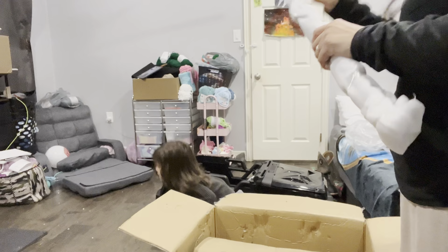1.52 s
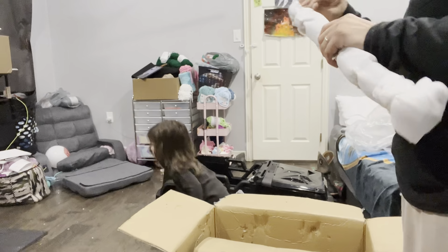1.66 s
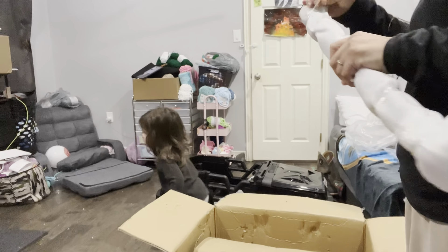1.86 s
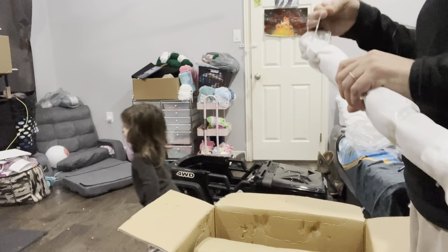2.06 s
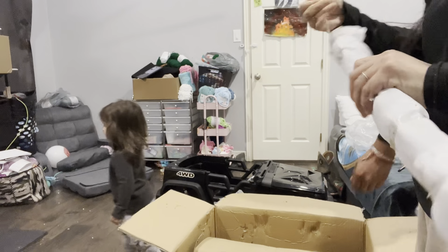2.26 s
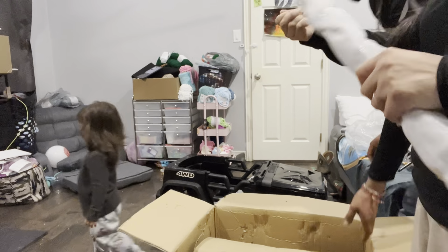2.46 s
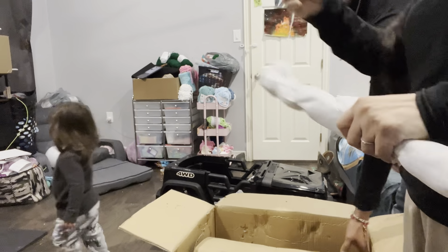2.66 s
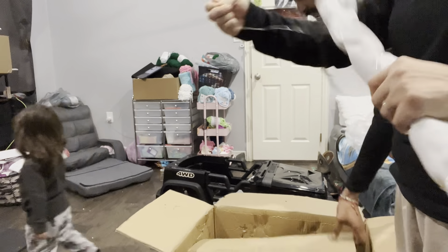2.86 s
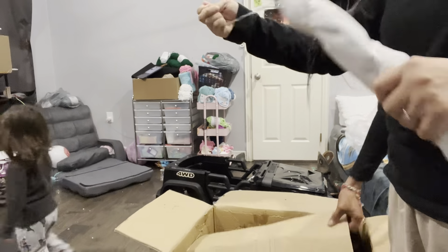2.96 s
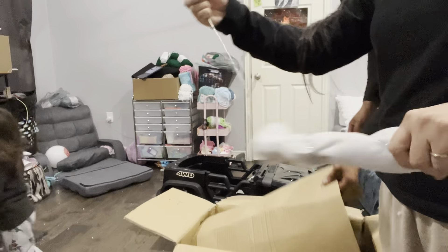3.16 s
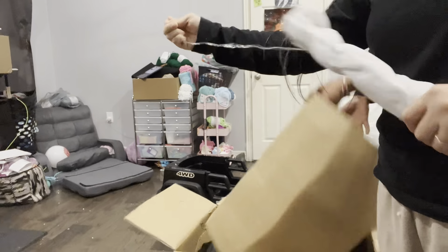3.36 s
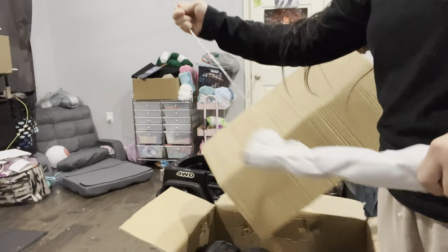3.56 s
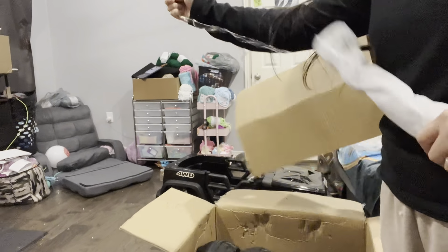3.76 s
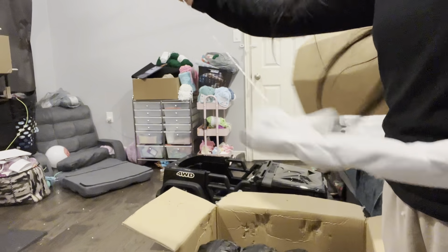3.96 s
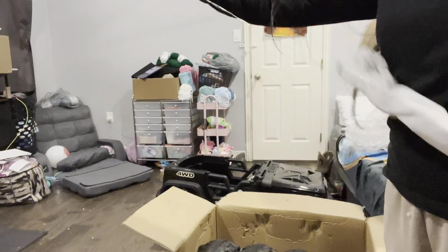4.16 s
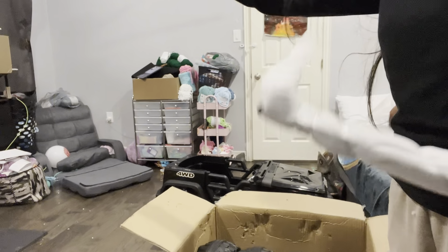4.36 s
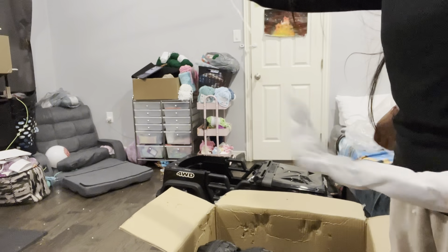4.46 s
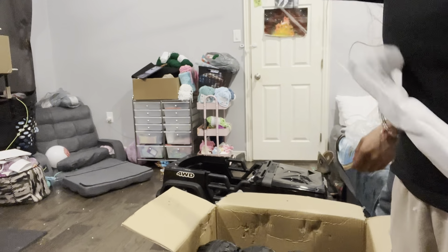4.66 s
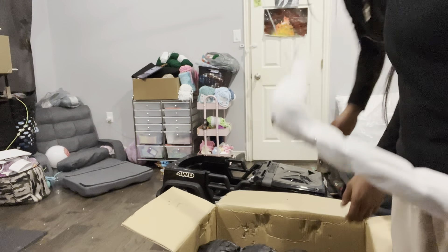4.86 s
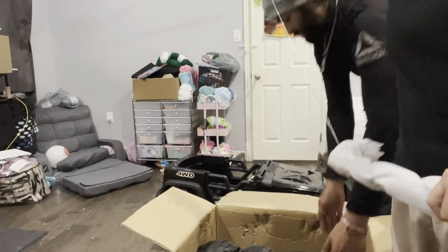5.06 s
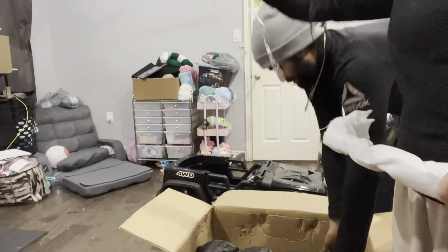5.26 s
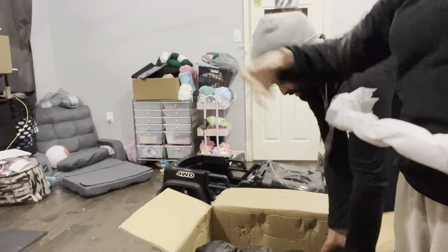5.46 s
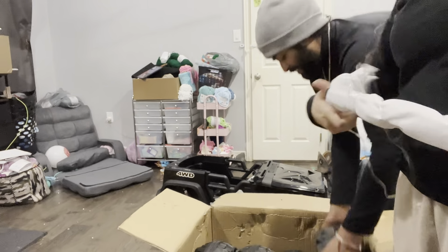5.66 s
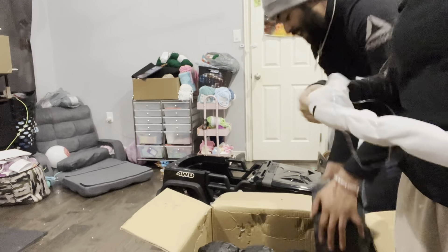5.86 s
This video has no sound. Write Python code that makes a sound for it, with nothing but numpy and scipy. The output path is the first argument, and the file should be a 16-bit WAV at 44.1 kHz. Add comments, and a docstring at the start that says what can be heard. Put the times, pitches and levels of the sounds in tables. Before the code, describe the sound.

Close-up unpacking: hollow box thumps, crisp cardboard cracks and crinkling packing film over faint hiss, with a brief metallic jingle near the end.

```python
"""Unpacking a big cardboard box

Cardboard and foam packing are pulled out of a box in a bedroom, close to a phone. Over quiet hiss,
noise shaken through wall resonances booms as the box drags, and ticking noise makes foam and film rustle.
Short pushes ring the walls as knocks, shaped noise bursts snap as creases, decaying sines jingle as metal.
The phone hears bass from two ports and places the treble by a short delay."""
import sys
import numpy as np
from scipy import signal
from scipy.fft import rfft, irfft, next_fast_len
from scipy.io import wavfile
from scipy.ndimage import uniform_filter1d

SR = 44100
rng = np.random.default_rng(int(sys.argv[2]) if len(sys.argv) > 2 else 0)


def master_out(mix):
    """Clip the mix to full scale and print it as 16-bit PCM to the path in sys.argv[1]."""
    frames = np.transpose(np.atleast_2d(mix))
    ceiling = np.clip(frames, -1, 1)
    pcm = np.round(ceiling * 32767).astype(np.int16)
    wavfile.write(sys.argv[1], SR, pcm)


N = 260975

# Hiss of room and microphones. Each row: frequency in Hz, density in dB per Hz.
AIR_COLOUR = [(30, -144), (50, -66), (70, -100), (200, -103), (600, -108), (1500, -107), (5000, -104),
              (7500, -108.5), (12000, -102), (15700, -110), (16100, -140)]
# Room decay. Each row: frequency in Hz, time to fall 60 dB in seconds.
ROOM_DECAY = [(150, 0.29), (500, 0.35), (1500, 0.31), (4000, 0.39), (9000, 0.26), (15000, 0.14)]
# Likeness of a spread source at the two ports. Each row: frequency in Hz, likeness from 0 to 1.
PORT_LIKENESS = [(120, .95), (250, .75), (500, .4), (2500, .35), (5500, .4)]

# Jolts of a small metal part. Each row: start in seconds, level in dB.
METAL_JOLTS = [(5.641, -38), (5.649, -29), (5.732, -50), (5.785, -53)]
# Modes of that part. Each row: pitch in Hz, relative level in dB, time to fall 60 dB in seconds.
METAL_MODES = [(2880, -5, .1), (2980, -2, .08), (3080, -2, .09), (4786, 3, .12), (4791, -14, .7),
               (6915, -4, .13), (7240, -10, .35), (9000, -9, .15), (9450, -4, .14), (10430, -7, .22),
               (11500, -6, .17), (12600, -9, .15), (14200, -6, .1), (14600, -6, .11)]
# A thin wavering tone. One row: start in seconds, end in seconds, level in dB, pitch in Hz, width in Hz.
THIN_TONE = (5.8, 5.96, -45, 2010, 40)

# Modes of the box walls, main wall first. Each row: pitch in Hz, width in Hz, relative level in dB.
WALL_MODES = [(184, 22, -11.5), (266, 30, 6), (322, 5.9, -14.5), (434, 182, 1.5), (544, 38, -1),
              (612, 24, 0.5), (672, 380, -6)]
# Pitch of the booming wall as the box flexes. Each row: time in seconds, pitch in Hz.
FLEXING_PITCH = [(0, 202), (.9, 203), (1.15, 242), (1.4, 191), (2.6, 200.4), (3.22, 224), (3.27, 175),
                 (3.5, 218), (4.4, 203), (4.55, 253), (4.8, 248), (5.0, 187), (5.12, 150), (5.3, 163.7),
                 (5.55, 190), (5.66, 227), (5.9, 233)]
# Colour of the floor thud. Each row: frequency in Hz, relative density in dB per Hz.
THUD_COLOUR = [(25, -18), (36, 9), (62, 20.5), (90, 6.5), (115, 16.5), (150, -21), (190, -45)]
# Pulls that drag and flex the box. Each row: peak time in seconds, seconds to rise 20 dB, seconds to fall
# 20 dB, wall boom in dB, upper modes in dB, floor thud in dB.
PULL_STROKES = [(0.02, 0.37, .3, -48, -52, -61), (0.1, 0.066, 0.18, -32, -34, -33.5),
                (0.259, 0.12, 0.26, -43, -49, -40.5), (0.489, 0.065, 0.18, -54, -47.5, -74),
                (0.789, 0.17, 0.11, -56, -57.5, -62), (0.923, 0.037, 0.56, -51, -61, -56),
                (1.12, 0.34, 0.1, -53, -50, -63.5), (1.44, 0.096, 0.072, -61, -57, -55.5),
                (1.525, 0.025, 0.03, -54, -63, -74), (1.81, 0.017, 0.19, -48.5, -43, -57),
                (1.895, 0.011, 0.044, -33, -47, -60), (2.071, 0.23, 0.11, -71, -54.5, -76),
                (2.193, 0.016, 0.017, -38, -41, -56), (2.325, 0.011, 0.045, -47, -52, -48),
                (2.519, 0.083, 0.093, -92.5, -108, -38), (2.66, 0.06, 0.89, -32.5, -72, -40),
                (2.885, 0.44, 0.066, -37.5, -37, -35), (3.045, 0.28, 0.33, -44, -41, -36),
                (3.245, 0.19, 0.23, -26, -28, -40), (3.31, 0.098, 0.12, -20.5, -28, -26.5),
                (3.42, 0.11, 0.7, -39, -46, -54), (3.651, 0.425, 0.053, -36, -71, -34.5),
                (3.955, 0.019, 0.19, -34.5, -78.5, -43), (4.057, 0.27, 0.04, -42, -45, -38.5),
                (4.245, 0.088, 0.11, -44.5, -45.5, -48), (4.441, 0.072, 0.13, -42, -42, -49),
                (4.55, 0.0047, 0.1, -24.5, -29, -20.5), (4.62, 0.14, 0.28, -40.5, -43, -35.5),
                (4.74, 0.33, 0.044, -35, -41.5, -57), (5.015, 0.15, 0.63, -40, -53, -44.5),
                (5.125, 0.017, 0.11, -28, -31, -30), (5.22, 0.059, 0.1, -50, -40, -68),
                (5.28, 0.036, 0.13, -31, -47, -35), (5.405, 0.011, 0.047, -35, -41, -45.5),
                (5.485, 0.19, 0.28, -33.5, -38, -41.5), (5.56, 0.057, 0.4, -21.5, -26, -30),
                (5.63, 0.058, 0.18, -18.5, -20, -27), (5.822, 0.041, 0.41, -21.5, -31.5, -50),
                (5.918, 0.076, .3, -25, -43, -55)]

# Rubs of foam and film. Each row: peak time in seconds, seconds to rise 20 dB, seconds to fall 20 dB,
# fine crackle in dB, duller cardboard scrape in dB.
RUB_STROKES = [(0.05, 0.1, 0.31, -41.5, -44.5), (0.428, 0.034, 0.18, -48, -53),
               (0.476, 0.12, 0.094, -42.5, -57), (0.784, 0.23, 0.23, -56, -65),
               (0.908, 0.07, 0.3, -49, -60), (1.11, 0.88, 0.12, -54.5, -60.5),
               (1.516, 0.02, 0.14, -44.5, -71.5), (1.612, 0.11, 0.061, -55, -52),
               (1.43, 0.13, 0.18, -69, -77), (1.73, 0.6, 0.13, -52.5, -75), (1.9, 0.25, 0.99, -46.5, -53),
               (2.2, 0.086, 0.23, -49, -49), (2.395, 0.05, 0.054, -40, -70), (2.47, 0.24, .8, -86, -77),
               (2.6, 0.24, .16, -44, -75), (2.9, 0.56, 0.4, -37.5, -41), (2.99, 0.094, 0.25, -30, -42),
               (3.042, 0.054, 0.95, -35.5, -37), (3.265, 0.33, 0.083, -25, -57),
               (3.392, 0.014, 0.034, -27.5, -43), (3.43, .1, 0.13, -49, -67),
               (3.782, 0.11, 0.42, -45.5, -54), (4.266, 0.23, 0.12, -44, -50),
               (4.572, 0.14, 0.081, -30.5, -37.5), (4.64, 0.21, 0.15, -39.5, -40.5),
               (4.8, 0.15, .13, -43, -49), (4.892, 0.04, 0.067, -35.5, -38),
               (4.93, 0.036, 0.015, -34.5, -57), (5.05, 0.31, 1, -44.5, -55), (5.118, 0.038, 1, -49.5, -59),
               (5.55, 0.078, 0.13, -47, -40), (5.666, 0.18, 0.092, -34.5, -53),
               (5.72, 0.22, 0.18, -40, -57)]
# Colour of the fine crackle. Each row: frequency in Hz, relative density in dB per Hz.
FIZZ_COLOUR = [(300, -5.5), (1500, -15), (3000, -9), (5000, -10.5), (7500, -5.5), (10500, -8.5),
               (13000, -18), (15000, -14), (15750, -16), (16200, -68)]
# Colour of the cardboard scrape. Each row: frequency in Hz, relative density in dB per Hz.
SCRAPE_COLOUR = [(200, -33), (600, 14), (1200, 17), (2000, 19.5), (3500, -5), (7000, -37)]

# Knocks on the box. Each row: start in seconds, main wall peak in dB, main wall pitch in Hz,
# upper modes relative to that peak in dB, pitch of the struck flap in Hz.
BOX_KNOCKS = [(0.072, -22.5, 222, 9, 583), (0.097, -18, 175, -13, 540), (0.151, -23, 239, -23, 400),
              (0.244, -30.5, 226, -19, 540), (1.108, -45, 253, -15, 430), (1.125, -34, 254, -19, 430),
              (1.805, -49, 205, 6, 457), (1.887, -38, 243, 13, 472), (2.65, -28.5, 175, -3, 354),
              (2.791, -22.5, 207, -4, 620), (2.829, -35.5, 223, 3, 467), (2.86, -26, 228, -19, 407),
              (2.99, -26.5, 210, -9, 442), (3.045, -24.5, 200, -10, 430), (3.063, -38, 201, 10, 620),
              (3.09, -25, 201, -15, 456), (3.181, -35, 238, 7, 480), (3.21, -26.5, 254, -14, 606),
              (3.2604, -4.5, 192.4, -2.5, 621), (3.29, -24, 193, 8.5, 484), (3.319, -23, 191, -9, 346),
              (3.386, -38, 199, 7.5, 330), (3.436, -34, 190, 8.5, 307), (3.47, -34.5, 227, 9.5, 305),
              (3.553, -33, 233, 3.5, 530), (3.95, -34, 189, -11, 338), (4.444, -49, 259, 20, 420),
              (4.539, -30.5, 260, 6, 700), (4.551, -21, 250, 2, 744), (4.559, -22, 249, 1, 617),
              (4.586, -17.5, 242, -7, 556), (4.613, -24, 253, -5, 650), (4.636, -32, 260, -6, 560),
              (4.652, -30.5, 255, 5, 766), (4.69, -25, 285, -3, 530), (4.73, -35, 267, -8, 527),
              (4.757, -35.5, 245, 3, 625), (5.007, -30.5, 194, -17, 410), (5.118, -24, 136, 4, 737),
              (5.143, -29, 205, 1, 610), (5.208, -32, 195, -6, 596), (5.268, -25.5, 162, -3, 570),
              (5.398, -40, 173, 8.5, 450), (5.458, -20.5, 230, -30, 384), (5.519, -18, 226, -14, 450),
              (5.548, -3.5, 181.4, -10.5, 347), (5.596, -15, 173, -15, 300), (5.6188, -6, 203, -3, 556),
              (5.638, -14.5, 145.8, 9.5, 542), (5.655, -14, 266, -3, 530), (5.69, -20.5, 196, 10, 334),
              (5.704, -24.5, 197, 6.5, 416), (5.722, -23, 205, 9, 495), (5.749, -29.5, 200, 7, 423),
              (5.814, -16, 218, -5.5, 463), (5.841, -26.5, 255, 2.5, 520), (5.88, -20.5, 235, 0.5, 584)]

# Snapping creases. Each row: start in seconds, peak in dB, thump and body each relative to the crack
# in dB per Hz, panel pitch in Hz, left over right in dB.
CREASE_SNAPS = [(0.0706, -3.5, 1.5, 16, 1870, 3), (0.0742, -9.5, 11, 12, 1200, -1),
                (0.41, -30, 6, -1, 1420, -4), (0.4258, -29.5, -11, 1, 1450, -3),
                (0.4819, -25, -5, 2, 991, -5), (0.489, -24, 5, 10, 1530, -3), (1.099, -42, 18, 30, 1310, 0),
                (1.517, -35.5, 14, 19, 1080, -2), (1.584, -20, -12, -14, 1010, -1),
                (1.61, -27, -16, 0, 2580, -12), (1.7759, -29, -10, -25, 2570, -2),
                (1.809, -27.5, 17, 2, 1040, 5), (1.8867, -2, 15.5, 8, 1750, -1),
                (2.105, -39, -10, 9, 1180, -17), (2.1631, -9, -3, -9, 1670, -5),
                (2.172, -14.5, 4, 7, 1880, 3.5), (2.1806, -9.5, 3, -1.5, 1850, -1),
                (2.3161, -7, 5.5, 2.5, 1150, 8.5), (2.5287, -14, 2.5, 3, 1130, 6.5),
                (2.5792, -14, 13.5, 3.5, 1380, 1), (2.5866, -11, -6, -4, 1830, -9),
                (2.5955, -17.5, -15, 9, 1860, 4), (2.6208, -7.5, -10, 2.5, 1880, 2),
                (2.6493, -6, 0.5, -4, 1850, 3), (2.6835, -8, -17, 4, 1120, 1.5),
                (2.701, -19, -13, -10, 1400, -27), (2.7315, -6, -17, -4, 1150, 5),
                (2.7485, -15, -3, -1, 1990, 0), (2.8703, -22, -6, -12, 1477, -11),
                (2.991, -14.5, -3, 5, 1190, -5), (3.042, -19.5, 9, 26, 1240, 1),
                (3.061, -15, -4, -21, 1400, -7), (3.1045, -8, -25, -26, 9020, -3),
                (3.1554, -23, -2, 2, 1200, 3), (3.261, -8.5, 22, 32, 1210, -20),
                (3.333, -16.5, -8, -3, 1520, -2), (3.3489, -18, 4, -2, 1370, 0),
                (3.364, -11.5, 14, -4, 2530, -2), (3.388, -13, -3, 4.5, 1260, -6),
                (3.4, -19.5, 9, 8, 1420, 3), (3.554, -6, 7.5, -8.5, 1290, 0.5),
                (3.573, -16, -3, 14, 1200, 3), (3.582, -15, -12, -14, 1260, -25),
                (3.7342, -15, 4, -8, 1690, -10), (3.8141, -25.5, 4, 1.5, 1560, -4),
                (3.9072, -33, -10, -6, 1450, 4), (3.9303, -31.5, -16, 5, 1094, -17),
                (3.974, -26, -10, -8, 1510, -4), (3.9844, -23.5, -2, -5, 1710, -19),
                (3.9879, -6, 2, -16, 1310, 11.5), (3.996, -25, -6, -2, 1700, -3),
                (4.002, -15.5, -3, -15, 1700, -11), (4.017, -29, -8, -14, 1340, 5),
                (4.027, -30, -7, -19, 1310, 3), (4.097, -25.5, -12, -12, 1166, -3),
                (4.1587, -26.5, -20, -10, 2660, 1), (4.1712, -23, -37, -14, 2500, -16),
                (4.1755, -7.5, -4.5, -9.5, 2140, 11), (4.2168, -22, 8, -3, 1830, 7),
                (4.3892, -22, 16, 12, 1340, 1), (4.409, -21.5, -13, 1, 1700, 3),
                (4.44, -17, -6, -3, 1360, -13), (4.445, -7.5, 5, -1, 1250, 0),
                (4.4765, -21.5, -11, -10, 2630, -19), (4.6359, -9.5, 8, 3, 980, 8),
                (4.6958, 0.5, 1, 2, 1310, 3.5), (4.8862, -24.5, 15, 1.5, 1425, -4),
                (4.9269, -20, 12, 0.5, 1380, -5), (5.118, -28, -3, 10, 1000, -5),
                (5.5411, -16, 39, 6, 970, -4), (5.623, -23, 13, 19, 1280, -7),
                (5.7647, -20.5, -13, 9, 4100, -6), (5.7747, -23.5, 4, 8, 1300, 0)]
# Centres in Hz of a snap's thump, body, crack and top.
SNAP_BANDS_HZ = [500, 1600, 5000, 11000]

# Balance of the ports. Each row: frequency in Hz, left over right in dB.
PORT_BALANCE = [(60, 2.5), (150, 3), (330, 4), (800, -1.5), (2000, 1.5), (8000, 0)]
# Phase lead of the left port. Each row: frequency in Hz, lead in radians.
PORT_LEAD = [(0, 0), (340, -.45), (690, -2), (950, -3.2), (1300, -6.2), (2100, -9.4), (3500, -15.5),
             (5000, -18.3), (6500, -17.72)]
# Start and end in Hz of the blend above which both sides carry one signal.
MONO_BLEND_HZ = (5600, 6600)

# Metal
METAL_RISE_S, METAL_ROOM_DB = .003, -16
# Drag: the flexing wall's ring, and its level over the fixed low modes
BOOM_WIDTH_HZ, BOOM_DB = 55, 4
# Rustle: strength of the colour patches
PATCH_DB = 2.5
# Knocks: the main wall's swell and ring, then damping by the hand, at this rate for a full-scale knock
WALL_RISE_S, RING_HZ, GRIP_S, GRIP_DB_PER_S = .005, 24, .019, 4000
# Knocks: the flap's ring, and the share of the other upper modes beside it
FLAP_WIDTH_HZ, WALL_SHARE = 40, 0.6
KNOCK_ROOM_DB = -10
# Snaps: swell, dying times of crack and crunch, and the crunch's share
SNAP_RISE_S, CRACK_S, CRUNCH_S, CRUNCH = 0.00029, 0.00028, 0.0026, 0.28
# Snaps: top band relative to the crack, per Hz; it drops as the body grows
SNAP_TOP_DB, DULL_PER_DB = -1, 0.15
PANEL_WIDTH_HZ, SNAP_ROOM_DB = 230, -4.5
# Phone: extra samples of delay on the right side above the last row of PORT_LEAD
TREBLE_LAG = 8
# Phone: the microphones fade below the first, and the sound ends at the second
BASS_CUT_HZ, EDGE_HZ = 36, 17146


def amp(db):
    """Turns decibels into a plain factor."""
    return 10 ** (np.asarray(db) / 20)


def evened(x):
    """Brings a signal to an RMS of 1."""
    return x / np.sqrt(np.mean(x ** 2) + 1e-20)


def read(points, hz):
    """Reads a curve between its points on a logarithmic frequency scale."""
    f, value = np.transpose(points)
    return np.interp(np.log(hz + 1), np.log(f + 1), value)


def add(mix, s, sound):
    """Lays a sound into the mix at s seconds, cut off at the end."""
    part = mix[..., round(s * SR):][..., :sound.shape[-1]]
    part += sound[..., :part.shape[-1]]


def filtered(x, gain):
    """Multiplies the spectrum by gain(Hz)."""
    size = next_fast_len(x.shape[-1] + 4096)
    spectrum = rfft(x, size) * gain(np.fft.rfftfreq(size, 1 / SR))
    return irfft(spectrum, size)[..., :x.shape[-1]]


def coloured(x, points):
    """Gives a signal the colour of a table in dB, at an RMS of 1."""
    return evened(filtered(x, lambda hz: amp(read(points, hz))))


def resonate(x, hz, width):
    """A two-pole resonance with gain 1 at its top."""
    return signal.lfilter(*signal.iirpeak(hz, hz / width, SR), x)


def glide(x, hz, width):
    """A resonance that follows the curve hz: shift down, smooth twice, shift back."""
    turn = np.exp(2j * np.pi * np.cumsum(hz) / SR)
    r = np.exp(-np.pi * width / SR)
    smooth = signal.lfilter([1], np.convolve([1, -r], [1, -r]), x / turn)
    return (turn * smooth).real


def pair(x, other):
    """Two ports hear a spread source alike in the bass and less alike above."""
    same = lambda hz: np.clip(read(PORT_LIKENESS, hz), 0, 1)
    shared = filtered(x, same)
    own = filtered(other, lambda hz: np.sqrt(1 - same(hz) ** 2))
    return np.array([x, shared + own])


def strokes(rows):
    """Strokes swell and die steadily in dB and sum as power: one gain curve for each level column."""
    peak, rise, fall, *levels_db = np.array(rows).T[..., None]
    t = np.arange(0, N / SR + .01, .002)
    shape_db = -20 * np.where(t < peak, (peak - t) / rise, (t - peak) / fall)
    curves = [np.linalg.norm(amp(db + shape_db), axis=0) for db in levels_db]
    return [np.interp(np.arange(N) / SR, t, curve) for curve in curves]


def crackle(per_s, spread_db, hiss):
    """Hiss plus sparse ticks of very uneven size; two unrelated hisses share the ticks' moments."""
    tick_db = spread_db * np.minimum(rng.exponential(1, N), 4)
    ticks = amp(tick_db) * (rng.random(N) < per_s / SR)
    bursts = signal.lfilter([1], [1, -.95], ticks)
    return evened((hiss + evened(bursts)) * rng.standard_normal((2, N)))


def patchy(x):
    """Shifts the colour in random patches some hundred Hz wide and some tens of milliseconds long."""
    z = signal.stft(x, nperseg=256, noverlap=192)[2]
    patch = uniform_filter1d(rng.standard_normal(z.shape[1:]), size=5, axis=0)
    patch = uniform_filter1d(patch, size=16, axis=1)
    shifted = z * amp(PATCH_DB * evened(patch))
    return signal.istft(shifted, nperseg=256, noverlap=192)[1][:, :N]


def room(x):
    """Sparse taps of random sign, each band dying at its own speed."""
    taps = np.zeros((2, SR // 2))
    grid = np.arange(150, SR // 2 - 16, 16)
    at = grid + rng.integers(0, 16, (2, len(grid)))
    np.put_along_axis(taps, at, rng.choice([-1., 1.], at.shape), 1)
    hz, t, z = signal.stft(taps, SR, nperseg=256)
    decay = amp(-60 * t / read(ROOM_DECAY, hz)[:, None])
    tail = signal.istft(z * decay, SR, nperseg=256)[1]
    tail /= np.linalg.norm(tail[0])
    return pair(*signal.fftconvolve(x[None], tail, axes=1)[:, :N])


def air():
    """The quiet room and the hiss of the microphones, as steady coloured noise."""
    density = lambda hz: amp(read(AIR_COLOUR, hz)) * np.sqrt(SR / 2)
    return pair(*filtered(rng.standard_normal((2, N)), density))


def jingle():
    """A small metal part, jolted a few times, rings in decaying sines; a thin tone of narrow noise follows."""
    out, t = np.zeros((2, N)), np.arange(20000) / SR
    modes = sum(amp(db - 60 * t / t60) * np.sin(2 * np.pi * hz * t) for hz, db, t60 in METAL_MODES)
    ring = np.minimum(t / METAL_RISE_S, 1) * modes
    for s, db in METAL_JOLTS:
        add(out, s, amp(db) * ring)
    start, end, db, hz, width = THIN_TONE
    tone = evened(resonate(rng.standard_normal((2, len(t))), hz, width))
    tone = tone[:, -round((end - start) * SR):]  # the settled end
    add(out, start, amp(db) * tone * np.hanning(tone.shape[1]))
    return out


def drag():
    """Lumpy friction shakes the box walls and, lower down, the floor boards."""
    boom, upper, floor = strokes(PULL_STROKES)
    lumps = evened(uniform_filter1d(uniform_filter1d(rng.standard_normal(N), 500), 500))
    low_shake, high_shake, floor_shake = amp(2.24 * lumps) * rng.standard_normal((3, 2, N))

    low = evened(sum(amp(db) * resonate(low_shake, hz, w) for hz, w, db in WALL_MODES if hz < 400))
    wall_hz = np.interp(np.arange(N) / SR, *np.transpose(FLEXING_PITCH))
    flexing = evened(glide(low_shake, wall_hz, BOOM_WIDTH_HZ))
    low = evened(low + amp(BOOM_DB) * flexing)

    # a second, wider resonance trims the skirts of each upper mode
    high = evened(sum(amp(db) * resonate(resonate(high_shake, hz, w), hz, 4 * w)
                      for hz, w, db in WALL_MODES if hz > 400))
    thud = coloured(floor_shake, THUD_COLOUR)
    return pair(*(boom * low + upper * high + floor * thud))


def rustle():
    """Rubbing gives the fine crackle of foam and film over a duller scrape of cardboard."""
    fine, dull = strokes(RUB_STROKES)
    fizz = coloured(crackle(per_s=450, spread_db=3.0, hiss=2.4), FIZZ_COLOUR)
    scrape = coloured(crackle(per_s=270, spread_db=2.0, hiss=2.1), SCRAPE_COLOUR)
    return pair(*patchy(fine * fizz + dull * scrape))


def knocks():
    """A blow of a few milliseconds rings the main wall, until the hand damps it, and the struck flap."""
    out, t = np.zeros((2, N)), np.arange(9000) / SR
    push = np.exp(-t / 0.00043) * t / .001
    # each port hears its own mix of the other modes
    shares = rng.uniform(-1, 1, (len(BOX_KNOCKS), len(WALL_MODES), 2, 1))
    for (s, db, wall_hz, upper_db, flap_hz), share in zip(BOX_KNOCKS, shares):
        grip = amp(-GRIP_DB_PER_S * amp(db) * np.maximum(t - GRIP_S, 0))
        main = resonate(push, wall_hz, RING_HZ) * np.minimum(t / WALL_RISE_S, 1) * grip
        flap = resonate(push, flap_hz, FLAP_WIDTH_HZ)
        rest = sum(g * amp(mode_db) * hz * resonate(push, hz, w)
                   for g, (hz, w, mode_db) in zip(share, WALL_MODES) if hz > 300)
        upper = flap / abs(flap).max() + WALL_SHARE * rest / abs(rest).max()
        add(out, s, amp(db) * (main / abs(main).max() + amp(upper_db) * upper))
    return out


def snap_tint(x, lead, thump_db, body_db, panel_hz, ring):
    """Colours a snap in four bands and lets the cardboard panel ring; lead samples go in front."""
    band_db = [thump_db, body_db, 0, SNAP_TOP_DB - DULL_PER_DB * body_db]
    colour = [(120, thump_db - 25), *zip(SNAP_BANDS_HZ, band_db),
              (15800, band_db[-1] - 6), (17200, band_db[-1] - 30)]
    panel = lambda hz: 1 + ring / (1 + 2j * (hz - panel_hz) / PANEL_WIDTH_HZ)
    padded = np.pad(x, ((0, 0), (lead, 0)))
    return filtered(padded, lambda hz: amp(read(colour, hz)) * panel(hz))


def snaps():
    """Each crease gives a crack of about a millisecond and a short crunch; the room hears its smooth colour."""
    out, seeds, t = np.zeros((2, N)), np.zeros(N), np.arange(900) / SR
    lead = 100  # samples before the crack
    shape = (1 - np.exp(-t / SNAP_RISE_S)) * (np.exp(-t / CRACK_S) + CRUNCH * np.exp(-t / CRUNCH_S))
    impulse = 1. * (t == 0)[None]
    for s, db, thump_db, body_db, panel_hz, pan_db in CREASE_SNAPS:
        noise = pair(*rng.standard_normal((2, len(t))))
        crack = snap_tint(noise * shape, lead, thump_db, body_db, panel_hz, ring=2.48)
        crack *= amp(db) / abs(crack).max()
        add(out, s - lead / SR, crack * amp(np.array([[.5], [-.5]]) * pan_db))
        # a click with the energy of the crack excites the room
        click = snap_tint(impulse, lead, thump_db, body_db, panel_hz, ring=0.77)[0]
        click *= np.linalg.norm(crack[0]) / np.linalg.norm(click)
        add(seeds, s - lead / SR, click)
    return out + amp(SNAP_ROOM_DB) * room(seeds)


def scene():
    """Sums all layers; knocks and metal also sound in the room."""
    blows, metal = knocks(), jingle()
    blows_in_room = blows + amp(KNOCK_ROOM_DB) * room(blows[0])
    metal_in_room = metal + amp(METAL_ROOM_DB) * room(metal[0])
    return air() + metal_in_room + drag() + rustle() + blows_in_room + snaps()


def record(dry):
    """The two ports differ in level and phase, the treble by a delay; peaks round off; then the band limits."""
    half = np.array([[.5], [-.5]])  # each difference is split between left and right
    port_hz, radians = np.transpose(PORT_LEAD)

    def lead(hz):
        """Phase lead of the left port, a plain delay beyond the last row."""
        lag = 2 * np.pi * np.maximum(hz - port_hz[-1], 0) * TREBLE_LAG / SR
        return np.interp(hz, port_hz, radians) + lag

    one = dry.mean(0)
    steered = one + filtered(dry - one, lambda hz: np.interp(hz, MONO_BLEND_HZ, [1, 0]))
    ports = filtered(steered, lambda hz: amp(half * read(PORT_BALANCE, hz)) * np.exp(1j * half * lead(hz)))
    rounded = np.tanh(ports)
    bass_cut = signal.butter(3, BASS_CUT_HZ, "high", fs=SR, output="sos")
    edge = signal.firwin(2047, EDGE_HZ, window=("kaiser", 9), fs=SR)
    return signal.oaconvolve(signal.sosfilt(bass_cut, rounded), edge[None], "same")


dry = scene()
out = record(dry)
master_out(out)
```